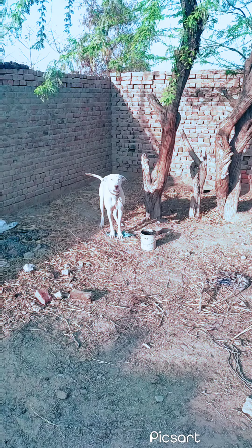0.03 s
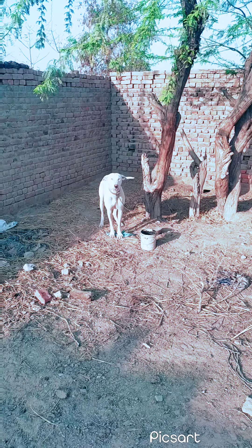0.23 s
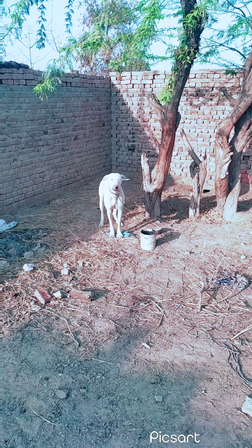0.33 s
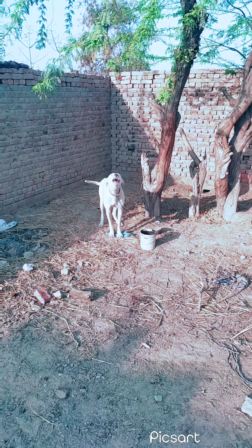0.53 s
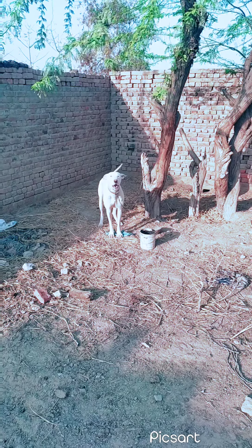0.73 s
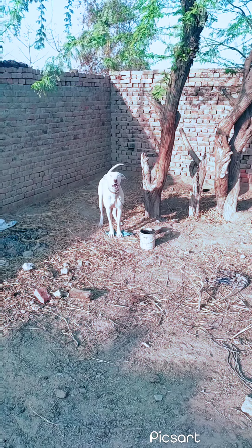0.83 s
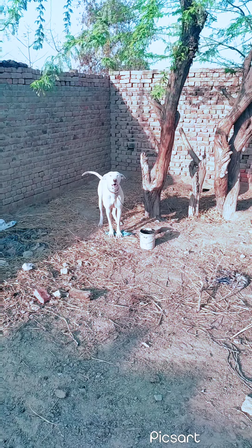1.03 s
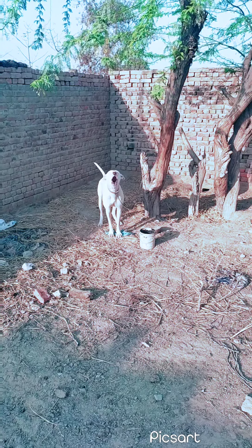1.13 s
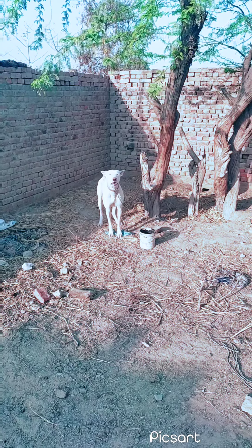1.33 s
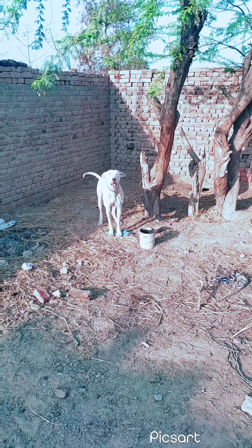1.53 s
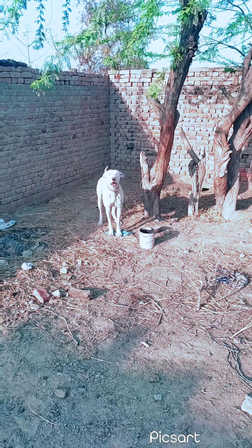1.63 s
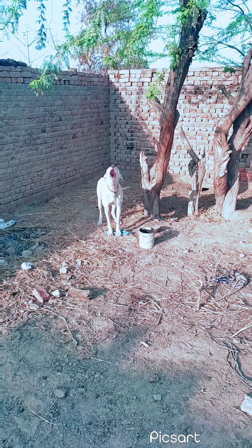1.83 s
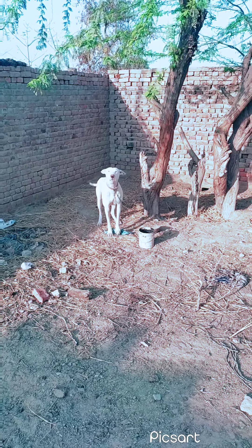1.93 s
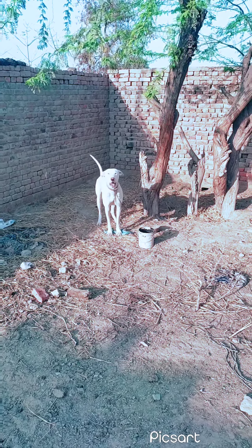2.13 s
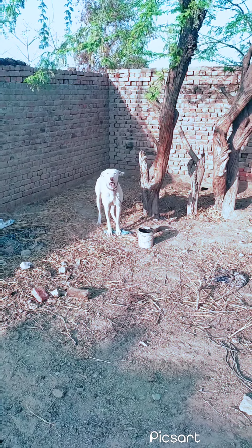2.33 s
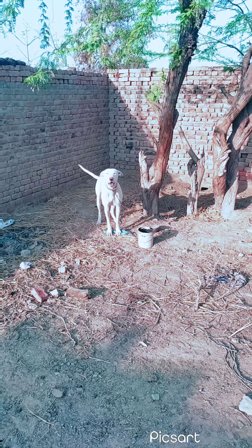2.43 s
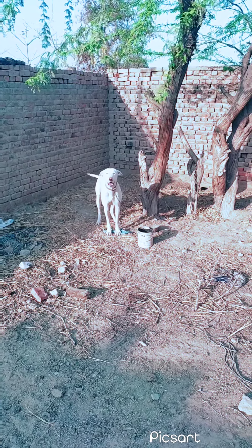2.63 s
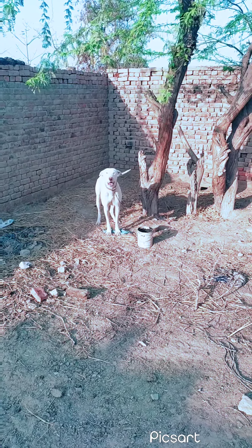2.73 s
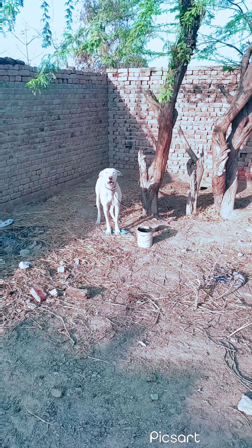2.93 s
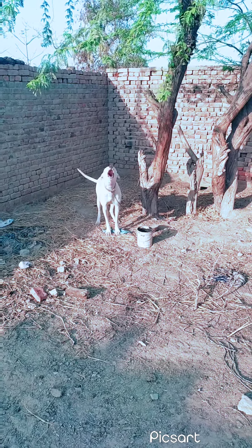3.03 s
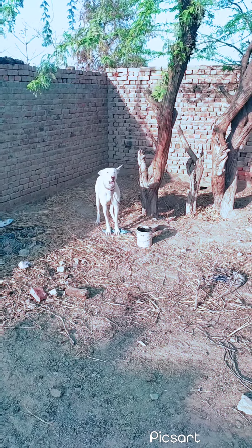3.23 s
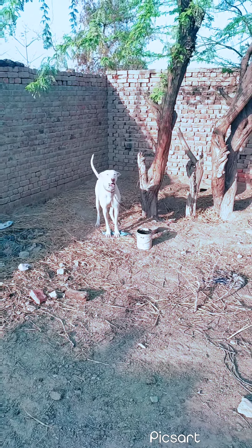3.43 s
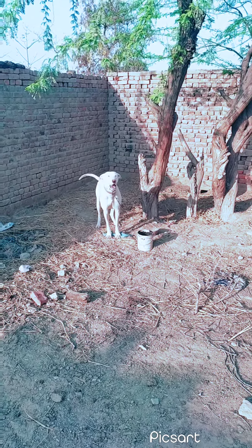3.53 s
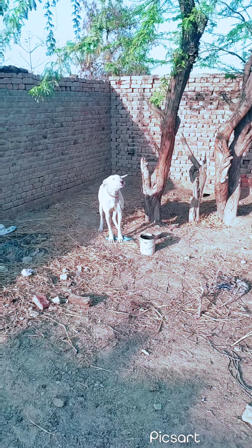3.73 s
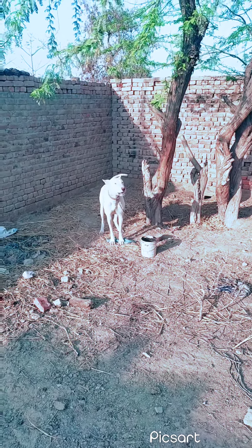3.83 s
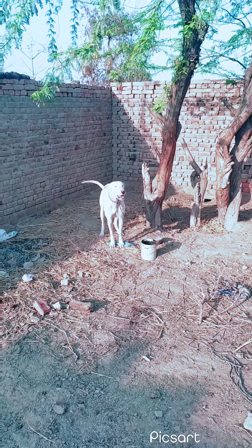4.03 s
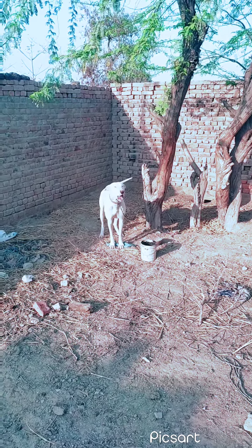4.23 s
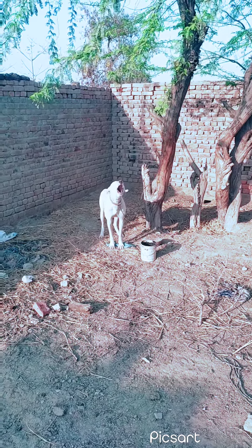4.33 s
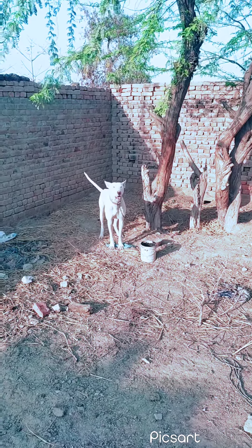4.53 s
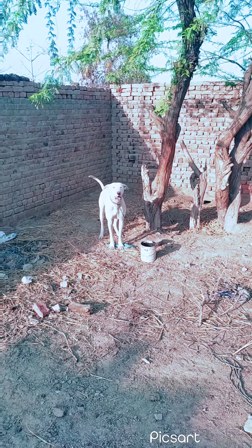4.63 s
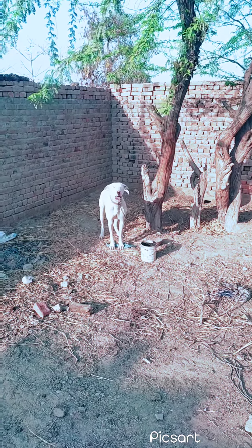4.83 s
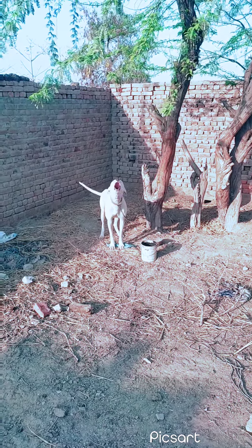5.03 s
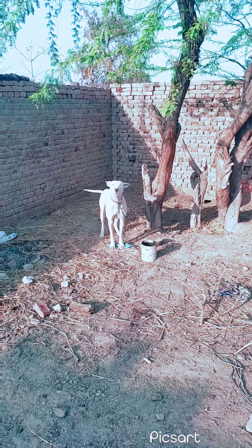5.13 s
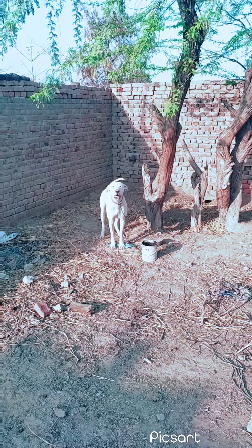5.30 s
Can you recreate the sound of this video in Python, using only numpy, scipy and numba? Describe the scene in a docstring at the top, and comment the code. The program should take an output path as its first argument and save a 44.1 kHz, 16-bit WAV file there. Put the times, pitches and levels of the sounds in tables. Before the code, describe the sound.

Big dog barking again and again outdoors, each loud bark echoing off brick walls, over light wind, bird chirps and dry swishes.

```python
"""After a short silence a wash of hiss opens and dies away over faint wind and leaves, and small birds chirp.
A large dog whines, yelps and then barks eleven times in a brick-walled yard: each bark starts as a growl,
climbs in pitch as the jaws open and drops to a grunt as they shut. Folds and breath sound through a moving
mouth; the walls ring on. Filtered noise makes the air, the microphone puffs and a few dry swishes, gliding
sines the birds, two wavering sines a drone. A limiter holds the barks down."""
import sys
import numpy as np
from scipy import signal
from scipy.fft import rfft, irfft, next_fast_len
from scipy.io import wavfile
from scipy.ndimage import uniform_filter1d, minimum_filter1d, map_coordinates
from numba import njit

SR = 44100
rng = np.random.default_rng(int(sys.argv[2]) if len(sys.argv) > 2 else 0)


def store_pcm(level_fs):
    """Save levels as 16-bit WAV."""
    pcm = np.round(np.clip(level_fs, -1, 1) * 32767).astype(np.int16)
    wavfile.write(sys.argv[1], SR, np.atleast_2d(pcm).T)


N = 370440
T = np.arange(N) / SR
START_S = 0.243  # all is silent until here
TOP_HZ = 15200  # upper edge of what the microphone passes

# Source levels are set ahead of the yard, the port colours and the limiter; the dog gets a gain on top.
# Colour of distant wind and leaves: f/Hz, relative level/dB
AIR_COLOUR = [(25, -25), (60, -17), (130, 0), (300, -3.5), (500, -12.5), (1000, -13.5), (2000, -17),
              (3200, -24), (6500, -32.5), (8000, -45.5), (12000, -38.5), (15000, -46)]
# Colour of the opening wash of hiss: f/Hz, relative level/dB
WASH_COLOUR = [(200, -20), (500, -5.5), (1500, -0.5), (2300, -2), (3200, -12.0), (6000, -24),
               (8000, -39), (15000, -43)]
# Faint far-off drone: f/Hz, mean level/dB
DRONE_LINES = [(172, -53.5), (372, -52)]
# Strongest puffs of air on the microphone: centre t/s, half length t/s, level/dB
AIR_PUFFS = [(0.914, 0.028, -32.5), (1.057, 0.0077, -24), (1.496, 0.043, -38.5), (2.558, 0.051, -39.5),
             (4.642, 0.036, -27), (4.809, 0.037, -27.5), (5.42, 0.018, -30.5), (5.919, 0.014, -16),
             (5.992, 0.014, -32), (6.526, 0.089, -27.5), (7.075, .1, -39), (7.29, 0.041, -29)]
# Colour of air on the microphone: f/Hz, relative level/dB
PUFF_COLOUR = [(25, -39), (60, -6.5), (115, 5), (220, -1), (320, -7.5), (600, -24.5), (2000, -59.5)]
# Weaker buffeting under the puffs: level/dB, widest swing/dB, turns a second
BUFFET_DB, BUFFET_SWING_DB, BUFFET_RATE = -45, 7.5, 7
# Single bird notes: start t/s, length t/s, start f/Hz, end f/Hz, peak level/dB before flutter
BIRD_NOTES = [(0.215, .2, 4720, 4385, -31.5), (0.252, .09, 5200, 5000, -40),
              (0.91, .045, 3850, 3790, -43.5), (1.468, .048, 4960, 3850, -41),
              (2.277, 0.023, 6840, 5960, -46.5), (2.313, .03, 6100, 5300, -47),
              (2.33, 0.04, 5200, 3700, -40.5), (3.453, .022, 4570, 3260, -42),
              (7.91, 0.087, 2940, 4190, -42), (8.343, 0.043, 3300, 4300, -49)]
# Runs of like rising notes from one bird: start t/s, notes, spacing t/s, end f/Hz, peak level/dB before flutter
BIRD_RUNS = [(2.282, 4, 0.029, 3500, -42), (6.002, 3, 0.029, 3660, -42), (6.5, 6, 0.035, 4070, -45),
             (7.213, 4, .037, 3800, -43)]
TWITTER_S, TWITTER_FROM_HZ = 0.038, 2470

# Single wall echoes: delay t/s, level/dB, left minus right level/dB
WALL_ECHOES = [(.0052, -42, 11.5), (0.0133, -7.5, -3.5), (.024, -9.5, 1.5), (0.0446, -23, -9.5),
               (.088, -24, 2)]
# Ring of the yard: f/Hz, relative level/dB, 60 dB decay t/s
YARD_RING = [(139, 29.5, 0.81), (500, -19, 1.2), (950, -4.5, 0.7), (2140, -0.5, 0.93), (4400, -5, 1.29),
             (7900, -16, 1.1), (14000, -9, .2)]
# Pitches that stand out in the ring: f/Hz, width f/Hz, level/dB over the plain ring
RING_PITCHES = [(462, 190, 4), (919, 79, 20.5), (1388, 130, 9), (1620, 30, 6), (1935, 110, 6.5),
                (2150, 33, 9.5)]

# Three single calls, as points of: t/s, pitch f/Hz, mouth resonance f/Hz, voice level/dB, roughness 0-1
WHINE_POINTS = [(.33, 487.5, 499, -41, 0.17), (.44, 520, 510, -33, .04), (.48, 635.6, 650, -38.5, .37),
                (.52, 904, 910, -29.5, 0.3), (.548, 880, 920, -45, 0.1)]
YELP_POINTS = [(.555, 780, 1550, 2, 0.093), (0.57, 801, 1290, -8.5, 0.51), (0.609, 805.3, 1910, -5.5, 0.51),
               (.645, 804.6, 1552, -16, .2), (0.674, 520.4, 650, -26.5, .55), (.76, 348, 500, -31, 0.35)]
HUFF_POINTS = [(2.475, 288.7, 586, -30.5, 0.44), (2.53, 285, 580, -29, 0.52), (2.557, 240.4, 1940, -28, 1),
               (2.63, 226, 1430, -35.5, 0.87)]
# Grumbles just before a bark: start t/s, length t/s, voice level/dB
GRUMBLE_EVENTS = [(1.199, .022, -36), (1.849, 0.017, -34.5), (3.66, 0.016, -31.5), (4.286, 0.051, -34),
                  (6.174, 0.027, -24), (7.3, 0.04, -31.5)]
GRUMBLE_HZ, GRUMBLE_MOUTH_HZ, GRUMBLE_ROUGH = 268.4, 576, 0.96
# Barks: start t/s, growl t/s, rise t/s, fall t/s, grunt t/s, jaws' lead on the fall t/s,
# growl f/Hz, top f/Hz, open mouth f/Hz, growl, open and grunt voice level/dB, growl and open roughness 0-1
BARK_EVENTS = [ (1.216, 0.015, .067, 0.011, 0.025, 0.0044, 291, 455.2, 1460, -4.5, -6, -2.5, .85, 0.27),
               (1.869, .018, 0.078, 0.02, 0.014, 0.0018, 265.1, 446.3, 1380, -7.5, -3, -8.5, 0.68, 0.28),
               (3.055, .030, 0.074, .012, .030, 0.013, 282.2, 483.8, 1430, -3.5, -6, -6.5, 0.31, 0.51),
               (3.692, 0.027, 0.081, 0.041, 0.018, .002, 287.8, 439.7, 1350, -9.5, -0.5, -19.5, 0.61, 0.18),
               (4.349, .040, 0.092, .035, 0.0086, .002, 291.8, 462, 1470, -5, -3.5, -21, 0.25, .22),
               (5.039, .040, .076, 0.034, 0.042, 0.013, 270.9, 465.8, 1320, -1.5, -8, -17, .45, 0.75),
               (5.622, 0.028, 0.052, .015, 0.026, 0.009, 272.7, 456.8, 1270, -8, -1, -4, 0.74, 0.37),
               (6.192, 0.012, 0.059, 0.013, 0.047, .016, 277.7, 450.8, 1340, -7, -2, -8.5, 0.8, .55),
               (6.741, .015, .056, 0.011, 0.045, 0.019, 268, 441.8, 1157, -5.5, -2.5, -7.5, .55, 0.8),
               (7.349, 0.059, 0.081, 0.011, 0.0262, 0.019, 259.6, 465, 1390, -8, -3, -5.5, 0.55, .36),
               (7.985, 0.025, 0.064, 0.015, 0.031, .028, 257.1, 447, 1175, -4.5, -13.5, -8.5, 0.4, 0.6), ]
# The growl: mouth almost shut while pitch and level creep up
GROWL_MOUTH_HZ, CREEP_HZ_PER_S, SWELL_DB_PER_S = 541, 700, 263.5
# The rise: pitch and mouth move fast at first and level off (higher = sooner)
PITCH_EASE, MOUTH_EASE = 1.9, 3
# The closing grunt: low, fairly clean, sagging and fading
GRUNT_HZ, GRUNT_MOUTH_HZ, GRUNT_ROUGH, SAG_HZ_PER_S, FADE_DB_PER_S = 256.3, 479, 0.26, 633, 168.5
# Fixed colour of the throat: f/Hz, relative level/dB
THROAT_COLOUR = [(150, -42), (320, -26), (410, -9), (500, -2), (620, -2.5), (770, -4), (920, 1), (1100, 0),
                 (1380, 1.5), (1700, -3), (2100, -1), (2420, -16), (3000, -24), (5000, -30), (8000, -48),
                 (15000, -56)]
# Colour of the breath rasp: f/Hz, relative level/dB
RASP_COLOUR = [(1500, -27), (2800, -18), (3800, 2), (5000, 9), (6500, 6), (8000, -15), (10000, -17),
               (12000, -11.5), (15000, -29)]
# Bright upper resonance of the wide-open mouth: f/Hz, relative level/dB
BRIGHT_COLOUR = [(1900, -36), (2400, 11), (2700, 0.5), (3100, 0), (3900, -35)]

# Dry swishes like broom strokes: start t/s, length t/s, attack t/s, level/dB, first ripple spacing f/Hz
SWISH_STROKES = [(2.885, 0.23, 0.0078, -26.5, 470), (3.896, 0.23, 0.045, -18, 452),
                 (4.103, 0.27, .035, -23, 454), (4.741, 0.26, 0.056, -22.5, 513),
                 (5.815, 0.24, 0.055, -27.5, 499)]
# Colour of the swishes: f/Hz, relative level/dB
SWISH_COLOUR = [(400, -39), (850, -11), (1350, 1), (2100, 7.5), (2900, -18.5), (4200, -16), (5100, -19.5),
                (6500, -19.5), (9000, -28.5), (10500, -47), (12000, -23.5), (14500, -62)]
RIPPLE_SINK = 0.14  # share by which the ripple spacing falls during a stroke

# Colour of the left port relative to the right: f/Hz, level/dB
PORT_COLOUR = [(400, -0.5), (1000, -1.5), (2200, -6), (5000, -3), (9000, -10.5), (12500, 8)]


def undb(db):
    """Decibels to gain."""
    return 10 ** (np.asarray(db) / 20)


def unit(x):
    """Scale to rms 1."""
    return x / np.sqrt(np.mean(x ** 2) + 1e-18)


def colour(x, points):
    """Filter by (Hz, dB) points joined on a log-frequency axis."""
    hz, db = np.transpose(points)
    size = next_fast_len(x.shape[-1] + 2048)
    f = np.maximum(np.fft.rfftfreq(size, 1 / SR), 1)
    gain = undb(np.interp(np.log(f), np.log(hz), db))
    return irfft(rfft(x, size) * gain, size)[..., :x.shape[-1]]


def gaussian(shape):
    """White noise from its own fresh seed."""
    return np.random.default_rng(rng.integers(2 ** 31)).standard_normal(shape)


def walk(size, rate):
    """Random wander with a spread near 1 and about rate turns a second."""
    at = np.arange(size) * rate / SR
    count = int(at[-1]) + 2
    return np.interp(at, np.arange(count), gaussian(count))


def fade(t, rise_s, fall_s):
    """Soft start and end over the times t."""
    rise = np.sin(np.pi / 2 * np.clip((t - t[0]) / rise_s, 0, 1))
    fall = np.sin(np.pi / 2 * np.clip((t[-1] - t) / fall_s, 0, 1))
    return rise * fall


def span(start, length):
    """The sample times of an event."""
    return T[int(start * SR):int((start + length) * SR)]


def ramp(t, start, length):
    """0 before start, rising evenly to 1 over length."""
    return np.clip((t - start) / length, 0, 1)


def blend(a, b, share):
    """From a at share 0 to b at share 1."""
    return a + (b - a) * share


def add(out, x, s):
    """Mix x into out at time s."""
    i = max(int(s * SR), 0)
    out[..., i:i + x.shape[-1]] += x[..., :max(N - i, 0)]


def place(x, pan_db, lag):
    """Two microphone ports; the right one hears it lag samples later."""
    at = np.arange(len(x))
    late = map_coordinates(x, [at - lag], order=3)
    return np.array([x * undb(pan_db / 2), late * undb(-pan_db / 2)])


@njit
def resonance(x, hz, width):
    """State-variable band-pass with a moving centre, gain 1 at the top."""
    y, band, low = np.empty(len(x)), 0., 0.
    for i in range(len(x)):
        g, k = np.tan(np.pi * hz[i] / SR), width[i] / hz[i]
        v = (band + g * (x[i] - low)) / (1 + g * (g + k))
        band, low, y[i] = 2 * v - band, low + 2 * g * v, k * v
    return y


def outdoors(air_db=-44.5, early_db=18.0, early_s=0.15):
    """Distant wind and leaves as slowly wavering noise; a louder wash of hiss dies away at the start."""
    noise = rng.standard_normal((2, N)) + rng.standard_normal(N)
    steady = unit(colour(noise, AIR_COLOUR)) * undb(air_db + walk(N, 2.0))
    decay = np.exp(-np.maximum(T - START_S, 0) / early_s)
    return steady + unit(colour(noise, WASH_COLOUR)) * undb(air_db + early_db) * decay


def drone():
    """Two faint sines, wavering in pitch and level."""
    out = np.zeros(N)
    for hz, db in DRONE_LINES:
        cycles = np.cumsum(hz * (1 + 0.00602 * walk(N, 2.5))) / SR
        out += np.sqrt(2) * np.sin(2 * np.pi * cycles) * undb(db + 2 * walk(N, 6.2))
    return out


def puffs(shared=0.74):
    """Moving air on the microphone: restless low buffeting and strong puffs, largely different at each port."""
    strength = undb(BUFFET_DB + BUFFET_SWING_DB * np.tanh(walk(N, BUFFET_RATE)))
    for centre, half, db in AIR_PUFFS:
        strength = strength + undb(db) * np.exp(-0.5 * ((T - centre) / half) ** 2)
    noise = rng.standard_normal((2, N)) + shared * rng.standard_normal(N)
    return unit(colour(noise, PUFF_COLOUR)) * strength


def birds(waver=0.06, flutter_db=3):
    """Thin gliding sines, some in quick runs; the wider the glide, the more it wavers."""
    out = np.zeros(N)
    runs = [(start + k * gap, TWITTER_S, TWITTER_FROM_HZ, end_hz, db)
            for start, count, gap, end_hz, db in BIRD_RUNS for k in range(count)]
    for start, length, from_hz, to_hz, db in BIRD_NOTES + runs:
        size = int(length * SR)
        wobble = waver * walk(size, 110) * abs(np.log(to_hz / from_hz))
        hz = np.linspace(from_hz, to_hz, size) * (1 + wobble)
        note = np.sin(2 * np.pi * np.cumsum(hz) / SR) * np.hanning(size)
        add(out, note * undb(db + flutter_db * walk(size, 70)), start)
    return out


def yard(x, ring_db=-17, build_s=0.005, likeness=1.0, far_db=-1, far_s=0.22, far_spread_s=0.031):
    """Single echoes off the brick walls, then a ring that favours a few pitches; its top treble dies first."""
    t = T[:int(SR * 3 / 2)]
    noise = rng.standard_normal((2, len(t))) + likeness * rng.standard_normal(len(t))
    steady = np.ones(len(t))
    favoured = noise.copy()
    for side in range(2):
        for hz, width, db in RING_PITCHES:
            favoured[side] += (undb(db) - 1) * resonance(noise[side], hz * steady, width * steady)
    # each frequency band gets its own level and decay
    f, frames, spectrum = signal.stft(favoured, SR, nperseg=256)
    hz, db, t60 = np.transpose(YARD_RING)
    db, t60 = (np.interp(np.log(f + 1), np.log(hz), c)[:, None] for c in (db, t60))
    ring = signal.istft(spectrum * undb(db - 60 * frames / t60), SR)[1][:, :len(t)]
    # the ring builds up, and swells once more as farther walls scatter the sound back
    far = undb(far_db) * np.exp(-((t - far_s) / far_spread_s) ** 2)
    swell = 1 - np.exp(-t / build_s) + far
    response = ring * swell * undb(ring_db) / np.sqrt(SR / 10)
    for delay, echo_db, pan_db in WALL_ECHOES:
        # an echo from one side meets that port first (one sample per dB of pan) and louder
        for side, sign in enumerate((1, -1)):
            response[side, int(delay * SR - sign * pan_db)] += undb(echo_db + sign * pan_db / 2)
    return signal.fftconvolve(x[None], response, axes=1)[:, :N]


def call(t, hz, mouth_hz, db, rough, jitter=0.05, uneven_db=5, shimmer_db=3, creak=0.5, noise_db=7.0,
         mouth_db=11, open_db=-8, mouth_share=0.55, shut_db=-12, bright_db=-19, rasp_db=-21,
         rasp_push=1.16, rasp_opening=0.17, rasp_flicker_db=3, swell_s=0.0096):
    """Vocal folds and turbulent breath sound through the throat and a moving mouth resonance."""
    size = len(t)
    rough = np.clip(rough, 0, 1)
    air, hiss = gaussian((size, 2)).T
    cycles = np.cumsum(hz * (1 + jitter * rough * walk(size, 350))) / SR
    # the folds never close twice alike: each partial wavers in level on its own
    folds = np.zeros(size)
    for k in range(1, 20):
        level = undb(uneven_db * min(k / 4, 1) * walk(size, 39.0))
        folds += np.cos(2 * np.pi * k * cycles) * (k * hz < 7000) * level
    # the breath comes in bursts, once a cycle
    gate = unit(np.exp(-1.5 * (cycles % 1)))
    source = unit(folds) + undb(noise_db) * rough * gate * air
    # rough folds weaken over every three cycles: a low creak
    creaking = np.exp(-creak * rough ** 2 * ((cycles / 3) % 1 - 0.5))
    source = source * creaking * undb(shimmer_db * rough * walk(size, 249.2))
    width = mouth_share * mouth_hz
    mouth = resonance(resonance(source, mouth_hz, width), mouth_hz, width)
    # sound outside the mouth resonance comes in as the lips part and sinks as the jaws close
    shut = (t > t[np.argmax(mouth_hz)]) * (1 - mouth_hz / mouth_hz.max())
    lips = undb(shut_db * shut) * fade(t, 0.02, 0.005)
    # a wide mouth lets the sound out, so its resonance stands out less with every octave
    boost = undb(mouth_db + open_db * np.log2(mouth_hz / 500))
    voice = unit(colour(lips * source + boost * mouth, THROAT_COLOUR))
    # with the jaws wide, a bright upper resonance comes through
    bright = unit(colour(source, BRIGHT_COLOUR))
    voice = voice + bright * undb(bright_db) * (mouth_hz / 1400) ** 2
    # air rasps unevenly past the teeth as the voice is pushed higher
    push = (np.minimum(hz, 480) / 400) ** rasp_push * (mouth_hz / 1000) ** rasp_opening
    flicker = undb(rasp_db + rasp_flicker_db * walk(size, 160))
    rasp = unit(colour(gate * hiss, RASP_COLOUR)) * flicker * push
    return (voice + rasp * fade(t, 0.023, 0.006)) * undb(db) * fade(t, swell_s, 0.0054)


def glide(points, edge_s=0.004):
    """Whine, yelp or huff: pitch, mouth, level and roughness glide from point to point."""
    s, *columns = np.transpose(points)
    t = span(s[0] - edge_s, s[-1] - s[0] + 2 * edge_s)
    return call(t, *(np.interp(t, s, c) for c in columns)), t[0]


def grumble(start, length, db, edge_s=0.006):
    """A low, rough, level note through a nearly shut mouth."""
    t = span(start - edge_s, length + 2 * edge_s)
    steady = np.ones(len(t))
    return call(t, GRUMBLE_HZ * steady, GRUMBLE_MOUTH_HZ * steady, db, GRUMBLE_ROUGH), t[0]


def bark(start, growl_s, rise_s, fall_s, grunt_s, early_s, growl_hz, top_hz, open_hz,
         growl_db, open_db, grunt_db, growl_rough, open_rough, lead_s=0.005, trail_s=0.0064):
    """Growl, rise, fall, grunt: effort lifts the pitch; the jaws open with it and start to shut before the fall."""
    t = span(start - lead_s, lead_s + growl_s + rise_s + fall_s + grunt_s + trail_s)
    opens = start + growl_s
    top = opens + rise_s
    to_go = 1 - ramp(t, opens, rise_s)
    effort, opening = 1 - to_go ** PITCH_EASE, 1 - to_go ** MOUTH_EASE
    falling, shutting = ramp(t, top, fall_s), ramp(t, top - early_s, early_s + fall_s)
    # seconds spent in the growl and in the grunt
    growling, grunting = np.minimum(t, opens) - start, np.maximum(t - top - fall_s, 0)

    rising_hz = blend(growl_hz + CREEP_HZ_PER_S * growling, top_hz, effort)
    hz = blend(rising_hz, GRUNT_HZ - SAG_HZ_PER_S * grunting, falling)
    mouth_hz = blend(blend(GROWL_MOUTH_HZ, open_hz, opening), GRUNT_MOUTH_HZ, shutting)
    rising_db = blend(growl_db - SWELL_DB_PER_S * (growl_s - growling), open_db, effort)
    db = blend(rising_db, grunt_db - FADE_DB_PER_S * grunting, falling)
    rough = blend(blend(growl_rough, open_rough, effort), GRUNT_ROUGH, falling)
    return call(t, hz, mouth_hz, db, rough), t[0]


def dog():
    """One throat gives the whine, the yelp, a huff, and the barks with their grumbles."""
    out = np.zeros(N)
    calls = [glide(points) for points in (WHINE_POINTS, YELP_POINTS, HUFF_POINTS)]
    calls += [grumble(*row) for row in GRUMBLE_EVENTS]
    calls += [bark(*row) for row in BARK_EVENTS]
    for sound, start in calls:
        add(out, sound, start)
    return out


def swishes(release_s=0.1):
    """Strokes of hiss; nearby reflections ripple the spectrum, and the ripples sink during the stroke."""
    out, noise = np.zeros(N), unit(colour(rng.standard_normal(N), SWISH_COLOUR))
    for start, length, attack_s, db, ripple_hz in SWISH_STROKES:
        t = span(start, length)
        lag = 1 / (ripple_hz * (1 - RIPPLE_SINK * ramp(t, start, length)))
        # the hiss plus two ever weaker delayed copies
        rippled = sum(0.55 ** k * np.interp(t - k * lag, T, noise) for k in range(3))
        add(out, unit(rippled) * undb(db) * fade(t, attack_s, release_s), start)
    return out


def scene(dog_db=2):
    """Dog, birds and swishes sound direct and through the yard, over puffs, outdoor air and drone."""
    barks, strokes, chirps = dog() * undb(dog_db), swishes(), birds()
    direct = place(barks, pan_db=4.5, lag=3.47)
    direct += place(strokes, pan_db=-1.5, lag=13.3)
    direct += place(chirps, pan_db=0.5, lag=1)
    mix = direct + yard(barks + strokes + chirps) + puffs() + outdoors() + drone()
    return mix * (T > START_S)


def record(dry, ceiling=0.95, release_s=0.039, bend=0.1, full_scale=0.66):
    """Ports colour the sound; a look-ahead limiter pins the barks and lets echoes swell back; peaks are rounded."""
    heard = np.array([colour(x, [(hz, sign * db / 2) for hz, db in PORT_COLOUR])
                      for x, sign in zip(dry, (1, -1))])
    over = np.log(np.maximum(np.abs(heard).max(axis=0) / ceiling, 1))
    # gain reduction jumps to each peak and then relaxes exponentially
    held = np.exp(np.maximum.accumulate(np.log(over + 1e-12) + T / release_s) - T / release_s)
    # look ahead and smooth over 65 samples
    gain = uniform_filter1d(minimum_filter1d(np.exp(-held), size=65), size=65)
    limited = heard * gain
    rounded = limited / (1 + (limited / full_scale) ** 6) ** (1 / 6)
    # lopsided overload leaves a low thud under the loudest moments
    thud_band = signal.butter(2, [55, 220], "band", fs=SR, output="sos")
    thud = signal.sosfilt(thud_band, rounded ** 2)
    top_cut = signal.ellip(8, 0.2, 70, TOP_HZ, fs=SR, output="sos")
    return signal.sosfilt(top_cut, rounded + bend * thud)


dry = scene()
out = record(dry)
store_pcm(out)
```